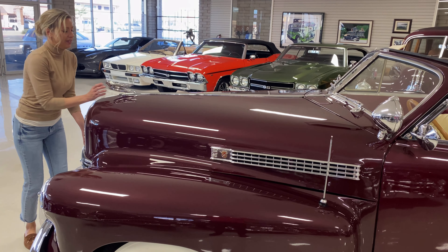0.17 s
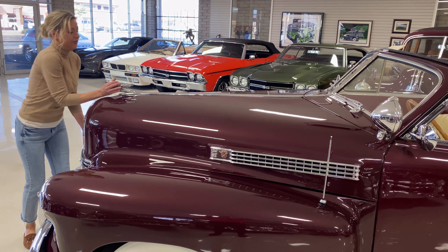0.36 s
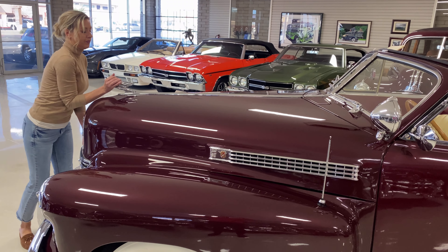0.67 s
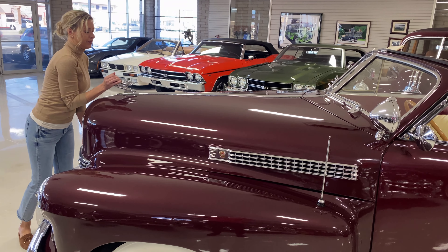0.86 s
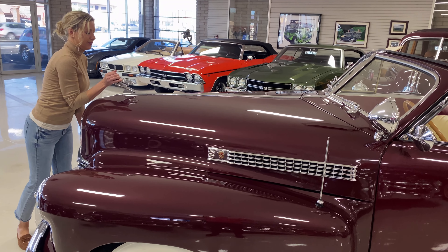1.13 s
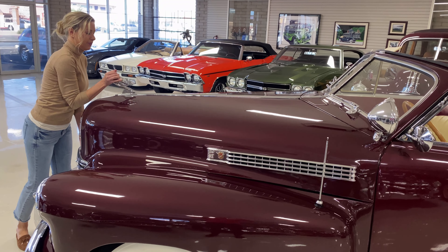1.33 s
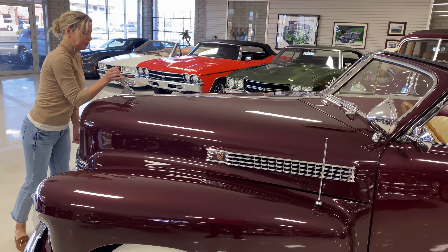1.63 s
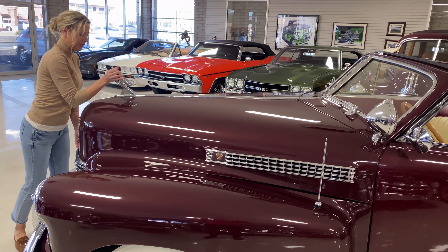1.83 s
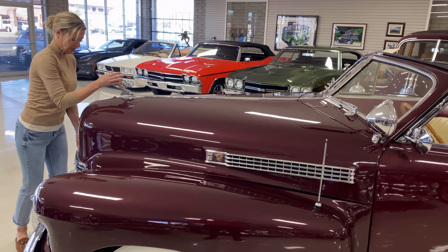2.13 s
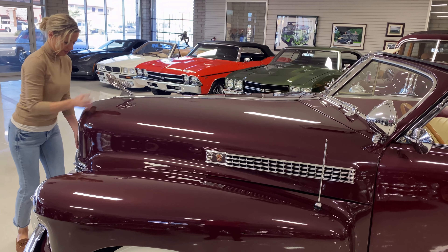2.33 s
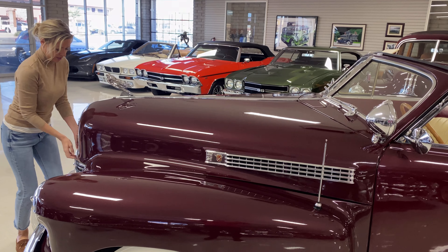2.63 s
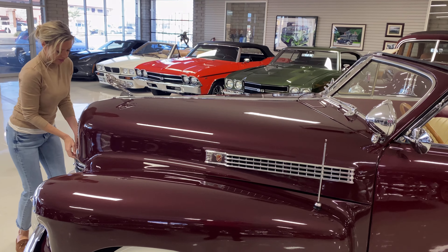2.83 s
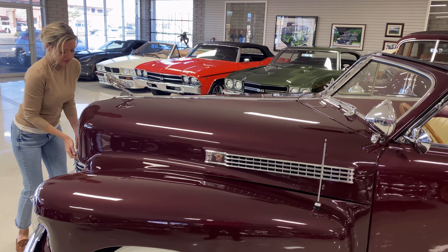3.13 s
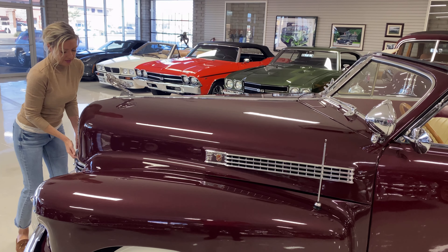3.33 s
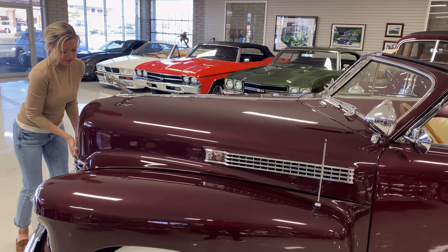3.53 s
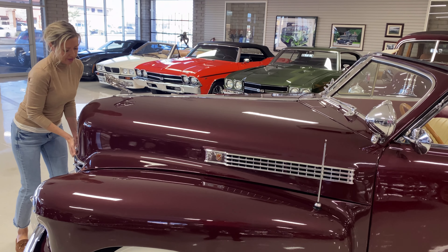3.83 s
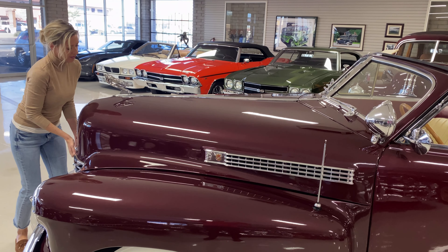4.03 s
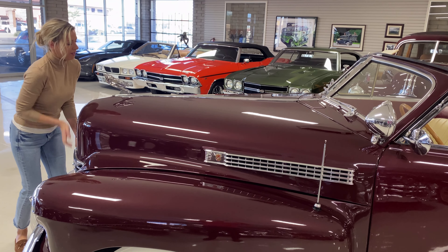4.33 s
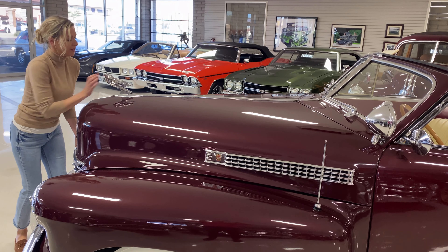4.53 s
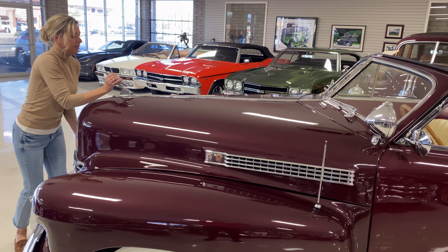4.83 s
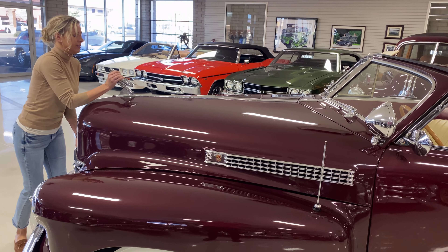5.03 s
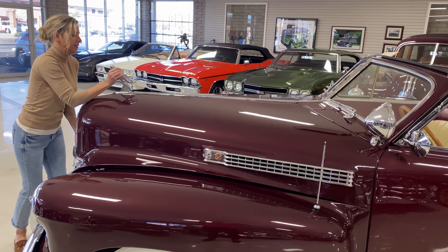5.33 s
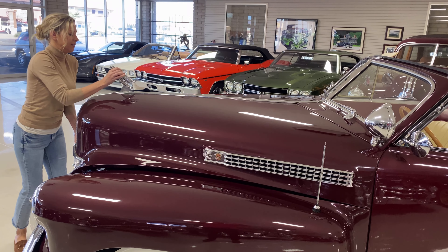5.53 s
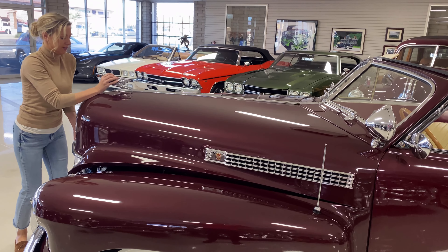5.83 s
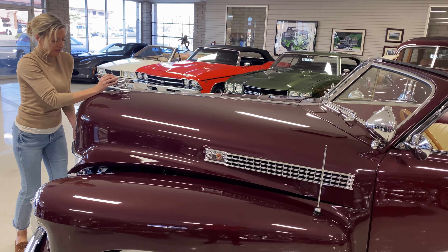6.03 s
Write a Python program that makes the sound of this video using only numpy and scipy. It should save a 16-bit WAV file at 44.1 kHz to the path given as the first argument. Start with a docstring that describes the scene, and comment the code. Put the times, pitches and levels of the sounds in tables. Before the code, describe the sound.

Close to the car, a knock and short metallic groan lead to a thin squeak, then a loud steel clunk with low thuds and loose rattle. After a lull, small catch parts scrape, snap and tick. A second solid clunk lands with dull thuds, followed by scraping, twanging spring metal and a low hinge groan. Far engine drone swells and sinks beneath steady air noise in a large hard room.

```python
"""Unlatching an old car hood

The long steel hood creaks in a large, hard-walled showroom, its latch lets go with a heavy clunk, the
safety catch is worked, and a second clunk frees the hood, which starts to rise on groaning hinges.
Contacts are shaped noise bursts and struck modes; creaks are stick-slip jerks into resonances; sliding is
grainy noise. An engine drones far off as wavering harmonics, over ventilation of coloured noise."""
import sys
import numpy as np
from scipy import signal
from scipy.io import wavfile
from scipy.ndimage import uniform_filter1d, map_coordinates

SR = 44100
rng = np.random.default_rng(int(sys.argv[2]) if len(sys.argv) > 2 else 0)


def transcribe(signal):
    """Save signal, clipped to [-1, 1], as a 16-bit WAV file at the path in sys.argv[1]."""
    frames = np.atleast_2d(signal).T
    limited = np.clip(frames, -1, 1)
    pcm = np.round(limited * 32767).astype(np.int16)
    wavfile.write(sys.argv[1], SR, pcm)


N = 272979
TIME = np.arange(N) / SR


def from_db(db):
    """Decibels to amplitude gain."""
    return 10 ** (np.asarray(db) / 20)


def rms_one(x):
    """Scale to unit rms."""
    return x / np.sqrt(np.mean(x ** 2) + 1e-20)


def in_time(rows):
    """Interpolate the second column of a curve at every sample."""
    seconds, values = np.transpose(rows)
    return np.interp(TIME, seconds, values)


def at_hz(points, hz):
    """Read a table on a log-frequency axis."""
    table_hz, values = np.transpose(points)
    return np.interp(np.log(hz), np.log(table_hz), values)


def bump(hz, centre_hz, octaves):
    """A bell on the log-frequency axis, 1 on top."""
    return np.exp(-(np.log2(hz / centre_hz) / octaves) ** 2)


def decay(t, t60):
    """Amplitude falling 60 dB in t60 seconds."""
    return np.exp(-np.log(1000) * t / t60)


def fade(power, t60):
    """Each input sample starts a decay that falls 60 dB of power in t60 seconds."""
    return signal.lfilter([1], [1, -1e-6 ** (1 / (t60 * SR))], power + 1e-22)


def ring(clicks, hz, t60):
    """A two-pole resonator: a unit click sets a decaying sine of initial height 1 ringing."""
    r, w = decay(1 / SR, t60), 2 * np.pi * hz / SR
    return signal.lfilter([0, np.sin(w)], [1, -2 * r * np.cos(w), r * r], clicks + 1e-18)


def chatter(per_s, spread_db):
    """Random tiny impacts of uneven size."""
    sizes = from_db(spread_db * np.minimum(rng.exponential(1, N), 4))
    return sizes * (rng.random(N) < per_s / SR)


def grain(per_s, spread_db, t60):
    """Jerky amplitude, rms 1: the power of random tiny impacts, each dying in t60 seconds."""
    return rms_one(np.sqrt(fade(chatter(per_s, spread_db) ** 2, t60)))


def strokes(rows, swell_db_per_s, fade_db_per_s):
    """Gain of a series of movements, each with swell, hold and fade straight in dB."""
    levels = []
    for start_s, hold_s, level_db in rows:
        early_s = np.maximum(start_s - TIME, 0)
        late_s = np.maximum(TIME - start_s - hold_s, 0)
        levels.append(level_db - swell_db_per_s * early_s - fade_db_per_s * late_s)
    return from_db(np.maximum(np.max(levels, axis=0), -140))


# Each row: Hz, left-right likeness from 0 to 1.
LIKENESS = [(60, 0.6), (150, 0.93), (300, 0.77), (600, 0.43), (1200, 0), (4000, 0.31), (15000, 0)]
EDGES_HZ = np.geomspace(28, 17000, 23)


def bands(size=N):
    """Yield (Hz, stereo noise band) of a diffuse field; every band has the same power per Hz."""
    white = rng.standard_normal((2, 2, size))
    for k, (low, high) in enumerate(zip(EDGES_HZ, EDGES_HZ[1:])):
        band = signal.butter(2, [low, high], "band", fs=SR, output="sos")
        mid, side = signal.sosfilt(band, white[k % 2])
        hz = np.sqrt(low * high)
        alike = np.clip(at_hz(LIKENESS, hz), -1, 1)
        yield hz, np.sqrt((1 + alike) / 2) * mid + np.sqrt((1 - alike) / 2) * side * [[1], [-1]]


def coloured(spectrum):
    """Diffuse stereo noise of a given colour, rms 1."""
    return rms_one(sum(from_db(at_hz(spectrum, hz)) * noise for hz, noise in bands()))


RIGHT_LAG_SAMPLES = 1.2


def from_the_left(x):
    """The straight path reaches the right channel a little later, by a fractional delay."""
    return np.array([x, signal.lfilter(np.sinc(np.arange(12) - RIGHT_LAG_SAMPLES), [1], x)])


# Reverberation of the showroom. Each row: Hz, t60 in seconds.
ROOM_T60 = [(60, 1.7), (150, 1.27), (600, 1.64), (2000, 1.283), (5000, 0.86), (9000, 0.38), (15000, 2.1)]


def showroom(x, wet_db):
    """Straight sound plus a one-second diffuse noise tail whose decay varies with frequency."""
    tail = sum(noise * decay(TIME[:SR], at_hz(ROOM_T60, hz)) for hz, noise in bands(size=SR))
    tail = rms_one(tail) / np.sqrt(SR)
    return from_the_left(x) + from_db(wet_db) * signal.fftconvolve(x[None], tail, axes=1)[:, :N]


# Ventilation colour. Each row: Hz, relative power density in dB per Hz.
AIR_COLOUR = [(15, -44), (25, -4.5), (87, 5.5), (212, -5), (242, 1), (270, -6), (575, -11), (775, -8),
              (1330, -13), (3080, -34), (3920, -60.5), (4870, -74.5), (11300, -59.5), (16000, -55.5)]
AIR_DB = -35.5


def ventilation():
    """Steady air noise: diffuse noise of a fixed colour."""
    return from_db(AIR_DB) * coloured(AIR_COLOUR)


def harmonics(orders, turns, waver_db):
    """Engine harmonics, each wavering slowly in strength; rms 1 in sum."""
    out, knots = 0, np.linspace(0, TIME[-1], num=40)
    for multiple, order_db in orders:
        waver = np.interp(TIME, knots, rng.standard_normal(len(knots)))
        tone = np.sin(2 * np.pi * (multiple * turns + rng.random()))
        out = out + from_db(order_db + waver_db * waver) * tone
    return rms_one(out)


# Engine speed. Each row: time in seconds, cycles per second.
ENGINE_SPEED = [(0, 20.2), (2.2, 19.0), (3.3, 18.5), (3.8, 17.75), (4.4, 17.5), (6.19, 17.4)]
# Harmonics of boom and upper drone. Each row: multiple of the speed, relative level in dB.
BOOM_ORDERS = [(2, -16.5), (3, 1), (4, 9), (5, 4.5), (6, -13.5)]
DRONE_ORDERS = [(7, -10), (8, -5), (9, -12), (10, 1), (11, -11), (13, -20)]
# Levels of boom and upper drone. Each row: time in seconds, level in dB.
BOOM = [(0, -38.5), (.9, -52), (1.4, -34.5), (2.5, -32.5), (2.85, -26), (3.3, -36.5), (3.8, -29.5),
        (4.45, -24.5), (4.85, -25.5), (6.19, -36)]
DRONE = [(0, -46), (.9, -52), (2.5, -37), (3.35, -32), (3.8, -36), (6.19, -59)]


def engine():
    """Only the low harmonics of a slowly settling engine pass the walls."""
    turns = np.cumsum(in_time(ENGINE_SPEED)) / SR
    boom = from_db(in_time(BOOM)) * harmonics(BOOM_ORDERS, turns, waver_db=1.5)
    drone = from_db(in_time(DRONE)) * harmonics(DRONE_ORDERS, turns, waver_db=1.0)
    return boom + drone


GRIP_DB_PER_S, RELEASE_DB_PER_S = 376.5, 351  # build-up and let-go of creak, squeak and clatter
# Moving linkage. Each row: start of full strength in seconds, hold in seconds, level in dB.
CLATTER = [(1.87, 0.024, -42), (2.01, 0.035, -39), (3.58, .07, -45.5), (3.79, 0.019, -46),
           (5.65, 0.056, -44), (5.72, 0.1, -37.5), (5.93, 0.031, -31), (5.98, 0.038, -38), (6.13, .04, -57)]
# Linkage resonances. Each row: Hz, relative level in dB, t60 in seconds.
LINKAGE = [(1097, 2, 0.019), (1780, 2, 0.017), (2220, -1.5, 0.012), (2650, 0, 0.0062), (3320, -5, 0.0076),
           (4620, -7.5, 0.0056), (6060, -23.5, 0.0023), (7040, -7, 0.0044), (11000, -8, 0.0029)]


def clatter():
    """Loose joints tick unevenly, each tick with its own mix of resonances."""
    ticks = chatter(per_s=350, spread_db=2)
    body = sum(from_db(mode_db) * ring(ticks * rng.standard_normal(N), hz, t60)
               for hz, mode_db, t60 in LINKAGE)
    return showroom(strokes(CLATTER, GRIP_DB_PER_S, RELEASE_DB_PER_S) * rms_one(body), wet_db=4.5)


SLIDE_SWELL_DB_PER_S, SLIDE_FADE_DB_PER_S = 155.5, 73
# First grip of the lever. Each row: start of full strength in seconds, hold in seconds, level in dB.
GRATING = [(.652, 0.068, -37.5)]
# Grit colour. Each row: Hz, relative power density in dB per Hz.
GRIT_COLOUR = [(300, -21.5), (1500, 2), (2500, 3.5), (5000, -4), (8000, -18), (12000, -19.5),
               (16000, -40.5)]


def grating(swell_db_per_s=330):
    """Dry metal of the lever grates in coarse grains of coloured noise."""
    gain = strokes(GRATING, swell_db_per_s, SLIDE_FADE_DB_PER_S)
    return gain * grain(per_s=230, spread_db=-10.5, t60=0.02) * coloured(GRIT_COLOUR)


# Strokes of catch and hinges. Each row: start of full speed in seconds, hold in seconds, level in dB.
SLIDE = [(.665, 0.022, -38.5), (3.555, 0.012, -31.5), (3.67, 0.065, -47), (3.95, 0.17, -44),
         (4.93, 0.042, -22), (5.28, 0.12, -28.5), (5.75, .03, -27.5), (5.87, 0.15, -30)]
# Sliding colour. Each row: Hz, relative power density in dB per Hz.
SLIDE_COLOUR = [(60, -13), (220, 2), (600, 6.5), (1100, -1), (2000, -6.5), (4000, -21.5), (8000, -42),
                (12000, -30.5), (16000, -58)]


def sliding():
    """Catch and hinges scrape: coloured noise with a fine grain."""
    gain = strokes(SLIDE, SLIDE_SWELL_DB_PER_S, SLIDE_FADE_DB_PER_S)
    return gain * grain(per_s=2200, spread_db=0.0, t60=0.13) * coloured(SLIDE_COLOUR)


def friction(gain, modes, slips_per_s, even_s=0.012):
    """Stick and slip: uneven jerks drive a few resonances, held at an even strength by the push."""
    slips = chatter(slips_per_s, spread_db=-1.5) * rng.choice([-1, 1], N)
    body = sum(from_db(mode_db) * ring(slips, hz, t60) for hz, mode_db, t60 in modes)
    local_power = np.abs(uniform_filter1d(body ** 2, int(even_s * SR)))
    return gain * body / np.sqrt(local_power + 0.00092 * np.mean(body ** 2))


def bent(x, pitch):
    """Bend the pitch along a curve of ratios by reading the sound at a varying speed."""
    return map_coordinates(x, [np.cumsum(in_time(pitch))], order=1, mode="mirror")


HINGE_SWELL_DB_PER_S, HINGE_FADE_DB_PER_S = 96, 88
# Pushes on hood, lever and hinges. Each row: start of full strength in seconds, hold in seconds, level in dB.
CREAK = [(.5, 0.082, -35), (.69, 0.022, -19), (.79, 0.043, -26), (.88, 0.13, -34)]
SQUEAK = [(1.085, .03, -46.5), (1.132, .02, -33.5), (1.18, 0.035, -34.5)]
HINGE = [(5.91, 0.18, -25.5)]
# Their resonances, the creak's before bending. Each row: Hz, relative level in dB, t60 in seconds.
CREAK_MODES = [(520, -3, .1), (632, 2, .18), (680, 0, .16), (765, -6, .09), (1170, -14, .1)]
SQUEAK_MODES = [(1310, -7, .045), (1365, 0, .09), (2075, -16, .025), (2290, -14, .025), (2520, -12, .03)]
HINGE_MODES = [(221, -15.5, 0.097), (277.4, 3, 0.16), (473, 11, 0.1), (648, 12.5, 0.039), (715, 4.5, 0.12),
               (796, -9, 0.11), (976, 5, 0.03)]
# Creak pitch, following the pressure of the hand. Each row: time in seconds, ratio.
CREAK_PITCH = [(.49, 1.03), (.6, .79), (.7, 1.02), (.78, 1.01), (1.05, 1.0)]


def creaks():
    """The hood groans and the lever squeaks as the latch takes up the load; later the hinges groan."""
    groan = bent(friction(0.97, CREAK_MODES, slips_per_s=900), CREAK_PITCH)
    groan = strokes(CREAK, GRIP_DB_PER_S, RELEASE_DB_PER_S) * groan
    pull = strokes(SQUEAK, GRIP_DB_PER_S, RELEASE_DB_PER_S)
    squeak = friction(pull, SQUEAK_MODES, slips_per_s=2600)
    rise = strokes(HINGE, HINGE_SWELL_DB_PER_S, HINGE_FADE_DB_PER_S)
    hinges = friction(rise, HINGE_MODES, slips_per_s=390)
    return showroom(groan + squeak + hinges, wet_db=-7.0)


def pinged(taps, modes):
    """Each tap rings the modes of a small part, a little differently every time."""
    out = np.zeros(N)
    for hz, mode_db, t60 in modes:
        clicks = np.zeros(N)
        for start_s, peak_db in taps:
            clicks[round(start_s * SR)] = from_db(peak_db + mode_db + 2 * rng.standard_normal())
        out += ring(clicks, hz, t60)
    return out


# Snaps of the catch spring; ticks of the lever taking up its slack. Each row: start in seconds, strength in dB.
TWANGS = [(3.590, -41), (3.622, -41), (3.636, -38), (4.859, -40), (5.827, -23), (5.838, -27), (5.852, -32),
          (5.917, -29)]
LEVER_TICKS = [(1.069, -47), (1.133, -45), (1.409, -40), (1.424, -39)]
# Modes of spring and lever. Each row: Hz, relative level in dB, t60 in seconds.
SPRING = [(1680, -2, .1), (2132, -4, .1), (2450, -7, .1), (2676, -7, .1), (2982, -7, .08), (3090, -5, .08),
          (3246, 0, .11), (3330, -2, .1), (3430, -4, .08), (4608, -10, .07), (5814, -12, .07),
          (6142, -13, .08), (6864, -8, .12), (7050, -12, .08)]
LEVER = [(1459, 0, .3), (1530, 0, .2), (1760, -4, .25), (2363, -4, .25), (2510, -2, .18), (2800, -7, .15),
         (3400, -8, .15), (4220, -4, .11), (4430, -4, .09), (5100, -10, .08), (6300, -14, .15),
         (6546, -12, .15)]


def twangs(spring_db=-2, lever_db=-3):
    """The catch snaps against its spring and the lever against its stop; both ring briefly."""
    spring = from_db(spring_db) * pinged(TWANGS, SPRING)
    lever = from_db(lever_db) * pinged(LEVER_TICKS, LEVER)
    return showroom(spring + lever, wet_db=-8)


def without_bass(x, order, cutoff_hz):
    """High-pass that takes out the deep bass."""
    return signal.sosfilt(signal.butter(order, cutoff_hz, "high", fs=SR, output="sos"), x)


# Low dull thumps during and after both clunks, with a few faint ones between.
# Each row: start in seconds, strength in dB, pitch in Hz, overtone in dB re fundamental.
THUDS = [(1.604, 6.5, 148.4, -2), (1.624, -2, 139, -2), (1.642, 1, 231, -13), (1.664, 1.5, 128, -2.5),
         (1.685, -6, 122, -5), (1.751, -10, 125, 1), (1.826, -18, 178, -3), (1.869, -9.5, 177, -2),
         (3.595, -15, 217, 1.5), (3.729, -23, 125, -8.5), (3.765, -19, 181, -3), (3.82, -14, 184, -8),
         (4.994, 2, 205, -12), (5.008, 1, 122, -0.5), (5.037, -3, 236, -24), (5.076, -3.5, 121, 2),
         (5.097, 1.5, 123, -6), (5.119, -3, 123, -9), (5.158, -9, 125, 1), (5.187, -13, 183, -14)]
THUD_T60_S, OVERTONE_RATIO, OVERTONE_T60_S = 0.066, 1.5, 0.027


def thuds():
    """Each row is a low, dull swing that dies fast: a damped sine with a shorter overtone."""
    out = np.zeros(N)
    for start_s, peak_db, hz, overtone_db in THUDS:
        push = np.zeros(N)
        push[round(start_s * SR)] = from_db(peak_db)
        out += ring(push, hz, THUD_T60_S)
        out += from_db(overtone_db) * ring(push, OVERTONE_RATIO * hz, OVERTONE_T60_S)
    return showroom(without_bass(out, 4, 70), wet_db=-10.5)


# Latch letting go, then safety catch. Each row: start in seconds, relative level in dB,
# treble edge in dB, clack in Hz, clack in dB, rattle t60 in seconds, gap to each rebound in seconds.
CLUNKS = [(1.562, -5.5, 11, 2520, 3.5, 0.36, .036), (4.988, -12, -0.5, 1470, 3.5, 0.2, .013)]
REBOUND_COUNT = 2
REBOUND_LOSS_DB, REBOUND_BASS_DB, REBOUND_DULLING_DB = 6, 9.5, 7.5  # weaker, deeper, duller each time
CLUNK_BASS_DB, CLUNK_RISE_SHARE = -2.5, 0.011  # first blow's bass; rise as a share of rattle t60
# Sharp clicks of latch parts. Each row: start in seconds, relative level in dB, treble edge in dB,
# snap burst in dB.
CLICKS = [(0.725, -19.5, 1, -42), (1.069, -36, -9, -47), (1.131, -31, -9, -44), (1.409, -29.5, -4.5, -41),
          (1.658, -25, 5, -5), (1.868, -28, -5, -44), (2.042, -27.5, -2, -43), (3.636, -28.5, 2, -38),
          (4.246, -32, -40, -45), (4.319, -39, -10, -60.5), (4.914, -26.5, 16.5, -35), (5.554, -41, 0, -42),
          (5.643, -37, -8, -47), (5.826, -19, -2, -34), (5.914, -20.5, 7, -18)]
CLICK_RISE_S, CLICK_T60_S, CLICK_HZ, CLICK_CLACK_DB, CLICK_BASS_DB = 0.0034, 0.14, 3040, 5, -1
# Dull knocks of hood, lever and catch. Each row: start in seconds, relative level in dB,
# bass weight in dB, clack in Hz, rattle t60 in seconds.
KNOCKS = [(0.486, -51.5, 23, 673, .28), (0.643, -22.5, -5.5, 700, 0.067), (0.665, -26, -2, 1840, 0.56),
          (2.009, -26, -5, 3900, 0.72), (3.574, -25.5, 2.5, 497, 0.32), (3.617, -22.5, 0, 2010, 0.25),
          (3.639, -25, 1, 990, 0.13), (3.653, -37, 7, 700, 0.069), (3.722, -28.5, 7, 1400, 0.18),
          (3.797, -31, 5.5, 500, 0.54), (4.728, -40, 12, 3980, 0.21), (4.859, -23.5, -9, 3370, 0.22),
          (5.001, -16.5, -9, 2000, 0.19), (5.019, -16.5, 5, 1260, 0.13), (5.333, -34, -29, 1010, 0.24),
          (5.923, -19.5, 2, 2250, 0.21), (5.943, -25, 4, 680, 0.11), (6.01, -24.5, -4, 680, 0.5),
          (6.078, -32.5, 10.5, 600, 0.38)]
KNOCK_RISE_S, KNOCK_CLACK_DB, KNOCK_EDGE_DB = 0.002, 5.5, -32  # rise at zero bass weight
KNOCK_SOFTENING_DB = 21.5  # this much more bass weight doubles the rise time


def contacts():
    """Every metal contact: (s, level dB, bass dB, clack Hz, clack dB, treble edge dB, rise s, t60 s)."""
    rows = []
    for first_s, db, edge_db, hz, clack_db, t60, gap_s in CLUNKS:
        for k in range(1 + REBOUND_COUNT):
            rows.append((first_s + k * gap_s, db - k * REBOUND_LOSS_DB, CLUNK_BASS_DB + k * REBOUND_BASS_DB,
                         hz, clack_db, edge_db - k * REBOUND_DULLING_DB, CLUNK_RISE_SHARE * t60, t60))
    for start_s, db, edge_db, _ in CLICKS:
        rows.append((start_s, db, CLICK_BASS_DB, CLICK_HZ, CLICK_CLACK_DB, edge_db,
                     CLICK_RISE_S, CLICK_T60_S))
    for start_s, db, bass_db, hz, t60 in KNOCKS:
        # a heavier part lands more softly
        rise_s = KNOCK_RISE_S * 2 ** (bass_db / KNOCK_SOFTENING_DB)
        rows.append((start_s, db, bass_db, hz, KNOCK_CLACK_DB, KNOCK_EDGE_DB, rise_s, t60))
    return rows


RATTLE_DB, RATTLE_PER_S, RATTLE_FADE_DB_PER_S = -8, 45, 38
RATTLE_LOW_HZ, RATTLE_HIGH_HZ, RATTLE_CYCLES = 350, 5500, 45  # cycles per t60
# Dense ring of the steel body, also in the clunks. Each row: Hz, relative power density in dB per Hz.
STEEL = [(35, -21), (70, -17), (125, 0.5), (220, -4), (400, -9), (700, -8), (1200, -11.5), (2000, -16),
         (3200, -25), (4600, -27), (7000, -26), (9000, -51.5), (12000, -23.5), (16000, -42.5)]


def rattle():
    """Loose steel taps at random as each clunk's shaking dies down; each tap rings its own modes."""
    shaking = sum(from_db(db - RATTLE_FADE_DB_PER_S * np.abs(TIME - start_s)) * (TIME > start_s)
                  for start_s, db, *_ in CLUNKS)
    taps = from_db(RATTLE_DB) * shaking * (rng.random(N) < RATTLE_PER_S / SR)
    out, at = np.zeros(N), np.flatnonzero(taps)
    for hz in np.geomspace(RATTLE_LOW_HZ, RATTLE_HIGH_HZ, num=30) * rng.uniform(.96, 1.04, 30):
        clicks = np.zeros(N)
        # about half the modes answer each tap
        clicks[at] = taps[at] * rng.standard_normal(len(at)) * (rng.random(len(at)) < .5)
        out += from_db(at_hz(STEEL, hz)) * ring(clicks, hz, RATTLE_CYCLES / hz)
    return showroom(out, wet_db=-14)


SNAP_T60_S, SNAP_CUTOFF_HZ = 0.026, 9980


def snaps():
    """Hard edges of the clicks meet with a very short, thin burst of high-passed noise."""
    t, out = TIME[:SR // 10], np.zeros(N)
    for start_s, _, _, snap_db in CLICKS:
        start = round(start_s * SR)
        burst = decay(t, SNAP_T60_S) * rng.standard_normal(len(t))
        out[start:start + len(t)] += from_db(snap_db) * burst
    thin = signal.sosfilt(signal.butter(4, SNAP_CUTOFF_HZ, "high", fs=SR, output="sos"), out)
    return showroom(thin, wet_db=-26.5)


def struck(modes, weight_db, uneven_db):
    """Every contact strikes each mode with its own strength, boosted near its clack."""
    start_s, _, _, clack_hz, clack_db, *_ = np.transpose(contacts())
    out = np.zeros(N)
    for hz, mode_db, t60 in modes:
        clack = clack_db * bump(hz, clack_hz, octaves=0.4)
        uneven = uneven_db * rng.standard_normal(len(start_s))
        clicks = np.zeros(N)
        clicks[np.round(start_s * SR).astype(int)] = from_db(weight_db + mode_db + clack + uneven)
        out += ring(clicks, hz, t60)
    return out


# Strongest modes of the hood panel; bright modes of small latch parts.
# Each row: Hz, relative level in dB, t60 in seconds.
PANEL = [(76, -14, .5), (124, -5, .45), (183, -7, .6), (222, -6, .4), (240, -4, .45), (262, -8, .35),
         (391, -18, .55), (480, -17, .55), (516, -14, .65), (685, -13, .7), (760, -17, .45), (878, -17, .7),
         (1018, -19, .45), (1165, -24, .45), (1320, -19, .45)]
LATCH = [(1104, -18, .6), (1400, -19, .7), (1502, -18, .6), (1550, -20, .6), (1647, -18, .6),
         (1667, -16, .4), (1960, -22, .6), (2051, -20, .4), (2170, -17, .45), (2503, -18, .5),
         (2600, -22, .5), (4107, -24, .3), (4280, -22, .3), (5896, -23, .25)]


def ringing(panel_db=-5, latch_db=-8):
    """Blows ring the modes of panel and latch; bass weight drives only the panel."""
    _, level_db, bass_db, *_ = np.transpose(contacts())
    panel = struck(PANEL, panel_db + level_db + bass_db, uneven_db=3.0)
    latch = struck(LATCH, latch_db + level_db, uneven_db=0.5)
    # an open sheet radiates no deep bass
    return showroom(without_bass(panel, 2, 65) + latch, wet_db=-7.0)


# Echo strength of the contacts. Each row: Hz, relative level in dB.
ROOM_DB = [(60, -11), (150, -8.5), (600, -7), (2000, -8.5), (5000, -7), (9000, -31), (15000, -32.5)]


def clunks(body_db=21, bass_hz=140, treble_hz=6000, build_t60=0.028, hold_t60=0.037,
           jolt_share=0.64, beamed_share=0.21, width=0.66):
    """Each contact rattles briefly, sets the many modes of the steel going and fills the room."""
    t, hits = TIME[:SR // 3], contacts()
    shapes = [((1 - np.exp(-t / rise_s)) * decay(t, t60)) ** 2 for *_, rise_s, t60 in hits]
    # metal chatters on metal: the straight sound comes in jolts
    jolts = grain(per_s=1500, spread_db=0.5, t60=hold_t60)
    straight, around = np.zeros(N), np.zeros((2, N))
    for hz, noise in bands():
        bass, treble = bump(hz, bass_hz, octaves=0.94), 1 / (1 + (treble_hz / hz) ** 2)
        power, spread = np.zeros(N), np.zeros(N)
        for (start_s, level_db, bass_db, clack_hz, clack_db, edge_db, _, _), shape in zip(hits, shapes):
            start = round(start_s * SR)
            clack = bump(hz, clack_hz, octaves=0.75)
            strength = from_db(level_db + bass * bass_db + clack * clack_db + treble * edge_db)
            burst = strength ** 2 * shape[:N - start]
            power[start:start + len(burst)] += burst
            # a sharp edge is beamed forward and feeds the room less
            beaming = from_db(-beamed_share * treble * max(edge_db, 0)) ** 2
            spread[start:start + len(burst)] += burst * beaming
        gain = from_db(body_db + at_hz(STEEL, hz))
        jerky = jolt_share * hz / (hz + 400)
        near = np.sqrt(power) * (1 - jerky + jerky * jolts)
        # a one-second shift makes the straight noise independent of the surrounding noise
        straight += gain * near * np.roll(noise[0], SR)
        # the room builds up and lets go slowly; the wide panel adds sound from all sides
        stored = fade(fade(spread, build_t60), at_hz(ROOM_T60, hz)) / (build_t60 * SR * 35)
        echo_power = from_db(at_hz(ROOM_DB, hz)) ** 2 * stored
        around += gain * noise * np.sqrt((width * near) ** 2 + echo_power)
    return from_the_left(straight) + around


LEFT_DB = 1.19  # left raised, right lowered by this


def scene():
    """Hood over engine and ventilation, all a little louder on the left."""
    background = ventilation() + engine()
    moving = clatter() + grating() + sliding() + creaks()
    hood = moving + twangs() + thuds() + rattle() + snaps() + ringing() + clunks()
    return (background + hood) * from_db([[LEFT_DB], [-LEFT_DB]])


CUTOFF_HZ = 16000


def record(dry):
    """Peaks near full scale saturate softly; a steep low-pass cuts the top."""
    clipped = dry / (1 + np.abs(dry) ** 10) ** (1 / 10)
    return signal.sosfilt(signal.ellip(10, .1, 70, CUTOFF_HZ, fs=SR, output="sos"), clipped)


dry = scene()
out = record(dry)
transcribe(out)
```